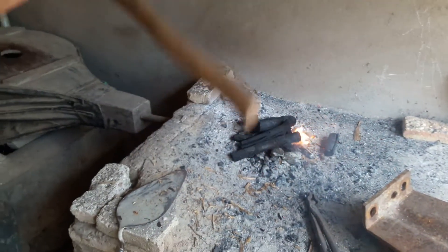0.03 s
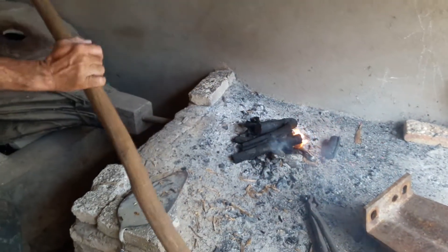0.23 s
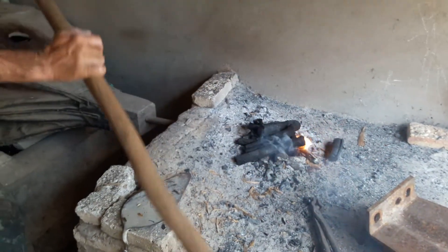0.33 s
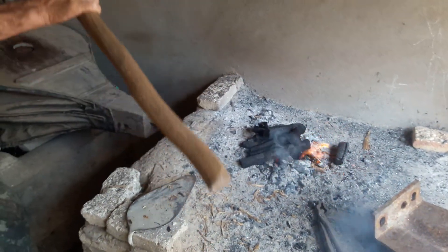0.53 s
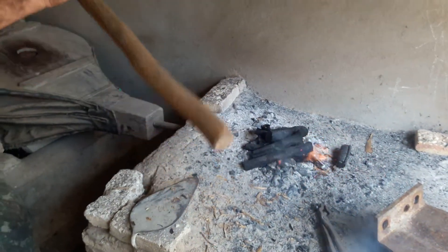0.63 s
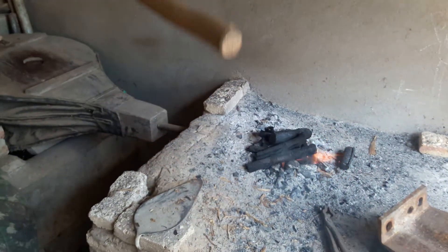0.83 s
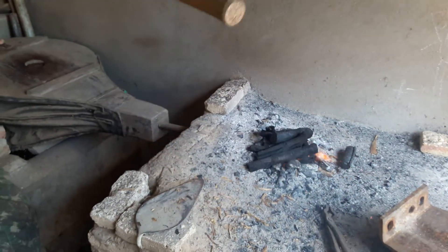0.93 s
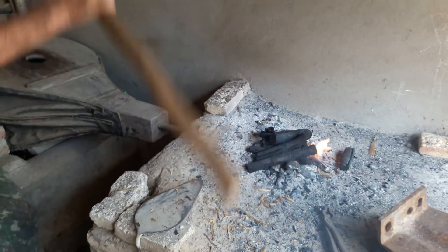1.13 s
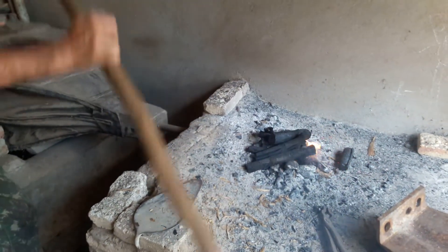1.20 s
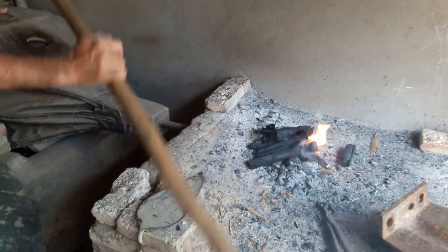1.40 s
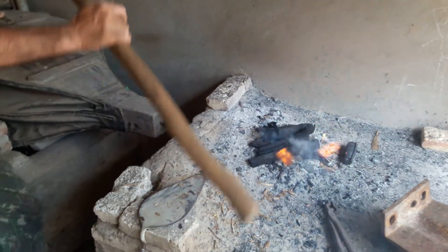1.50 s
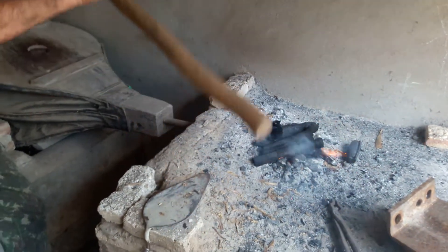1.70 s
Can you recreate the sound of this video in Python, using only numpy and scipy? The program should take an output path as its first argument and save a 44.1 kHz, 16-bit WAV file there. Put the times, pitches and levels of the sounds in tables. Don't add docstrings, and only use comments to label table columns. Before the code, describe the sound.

An old forge bellows breathes in and out, roaring into crackling coals with sharp claps and knocks

```python
import sys
import numpy as np
from scipy import signal
from scipy.fft import rfft, irfft
from scipy.io import wavfile
from scipy.ndimage import uniform_filter1d, map_coordinates

SR = 44100
rng = np.random.default_rng(int(sys.argv[2]) if len(sys.argv) > 2 else 0)


def undo_db(level):
    steps = np.asarray(level, float) / 20
    return 10 ** steps


def persist_wave(psi):
    counts = np.round(np.clip(psi, -1, 1) * 32767).astype(np.int16)
    wavfile.write(sys.argv[1], SR, np.atleast_2d(counts).T)


N = 77175
T = np.arange(N) / SR


def unit(x):
    return x / np.sqrt(np.mean(x ** 2))


def band(x, hz, width):
    b, a = signal.iirpeak(min(hz, .45 * SR), hz / max(width, 1), fs=SR)
    return signal.lfilter(b, a, x)


def air(colour):
    hz = np.arange(N // 2 + 1) * SR / N + 1
    points = np.array(colour)
    db = np.interp(np.log(hz), np.log(points[:, 0]), points[:, 1], left=-90)
    return unit(irfft(rfft(rng.standard_normal(N)) * undo_db(db), N))


def walk(rate_hz):
    k = int(SR / rate_hz)
    return unit(uniform_filter1d(uniform_filter1d(rng.standard_normal(N), k), k))


def strokes(curves, layer=0):
    gain = 0
    for curve in curves:
        s, db, over_db = np.array(curve).T
        gain = gain + undo_db(np.interp(T, s, db + layer * over_db, left=-120, right=-120))
    return gain


def rung(resonances, flutter_db, rate_hz):
    out = 0
    for hz, width, db in resonances:
        ring = rng.standard_normal(N)
        for _ in range(2):
            ring = band(ring, hz, 1.16 * width)
        shift = np.cumsum(.015 * walk(14))
        ring = unit(map_coordinates(ring, [np.arange(N) + shift], mode="mirror"))
        out = out + undo_db(db + flutter_db * walk(rate_hz)) * ring
    return out


# (frequency [Hz], level [dB per Hz])
SHOP_COLOUR = [(18, -54), (30, -11), (48, -10), (239, -23.5), (499, -2), (721, 3), (3140, -12), (8520, -76),
               (16000, -39)]


def shop():
    return air(SHOP_COLOUR) * undo_db(-63 + 1.5 * walk(8))


def room(x):
    gap_s, t60_s, level_db = .0015, 0.09, 4
    d = np.arange(int(.5 * SR)) / SR
    echoes = rng.standard_normal(len(d)) * undo_db(-60 * d / t60_s) * np.clip(d / gap_s, 0, 1)
    return signal.fftconvolve(x, echoes / np.sqrt(np.sum(echoes ** 2)))[:N] * undo_db(level_db)


# (start [s], length [s], from [Hz], to [Hz], peak level [dB])
SQUEAKS = [
    (1.354, .1, 745, 670, -51),
    (1.471, 0.06, 970, 840, -55),
    (1.215, 0.081, 4300, 4300, -60.5),
]


def squeaks():
    out = 0
    for start, length, from_hz, to_hz, db in SQUEAKS:
        u = np.clip((T - start) / length, 0, 1)
        hz = (from_hz + (to_hz - from_hz) * u) * (1 + 0.0089 * walk(60))
        tone = np.sin(2 * np.pi * np.cumsum(hz) / SR)
        out = out + undo_db(db + 2 * walk(50)) * np.sin(np.pi * u) * tone
    return out


# (time [s], peak level [dB], ring [Hz], swell [s], level of the side modes [dB])
KNOCKS = [
    (0.4795, -21, 1753, 0.0034, -6),
    (1.523, -22, 1700, 0.004, -0.5),
]
# (multiple of the ring [-], level [dB], time to fall 60 dB [s])
LEVER_MODES = [(1, 0.5, 0.0064), (.58, -3, 0.014), (.45, -6, 0.0067), (1.25, -5, 0.015),
               (1.9, -12.5, 0.0062), (.72, -3.5, 0.011), (.86, -24, 0.021), (1.55, -13, 0.015)]


def knocks():
    thud_t60_s = .09
    out = 0
    for s, db, ring_hz, swell_s, side_db in KNOCKS:
        d = np.maximum(T - s, 0)

        def mode(hz, t60_s, rise_s):
            swell = 1 - np.exp(-(d / rise_s) ** 2)
            fade = undo_db(-60 * np.maximum(d - rise_s, 0) / t60_s)
            return swell * fade * np.sin(2 * np.pi * hz * d)

        knock = undo_db(-9.5) * mode(96, thud_t60_s, 0.0029)
        knock = knock + undo_db(-14) * mode(160, thud_t60_s, .02)
        for multiple, mode_db, t60_s in LEVER_MODES:
            main = multiple == 1
            level = undo_db(mode_db + (0 if main else side_db))
            knock = knock + level * mode(ring_hz * multiple, t60_s, swell_s if main else .0004)
        out = out + undo_db(db) * knock
    return out


# (time [s], peak level [dB], colour [Hz], tail level [dB])
POPS = [(.0034, -27.5, 9200, -17), (0.1422, -33.5, 5900, -14.5), (0.45, -41, 7200, -28),
        (0.473, -43, 5000, -24), (0.5075, -41, 5200, -12.5), (0.514, -35, 10900, -11),
        (0.5292, -25.5, 9050, -17), (.667, -38, 6240, -27), (0.817, -30, 8300, -21.5),
        (1.079, -32.5, 7050, -21), (1.1982, -42, 8000, -19), (1.498, -41, 7340, -24),
        (1.514, -45, 7000, -14), (1.6288, -40, 7000, -15), (1.162, -43, 10000, -21),
        (1.553, -41, 10500, -11), (1.567, -46, 9500, -16), (1.64, -41, 11500, -16.5)]
# (time [s], peak level [dB], colour [Hz], tail level [dB])
STRIKES = [
    (.3409, -17, 3500, -22),
    (.3423, -11.5, 4800, -24),
    (.5894, -21, 8500, -17),
    (.5913, -18, 8000, -19),
    (1.3974, -22, 4600, -25),
    (1.3988, -20, 5000, -25),
]
FULL_CLAPS = (.341, .59, 1.3975)


def clicks():
    out = np.zeros(N + SR // 2)
    d = np.arange(SR // 2) / SR
    gap_s, fast_t60_s, slow_t60_s, slow_db = .0015, 0.11, 0.12, -9
    fade = undo_db(-60 * d / fast_t60_s) + undo_db(slow_db - 60 * d / slow_t60_s)
    fade = np.clip(d / gap_s, 0, 1) * fade
    thin = signal.butter(2, 3320, "highpass", fs=SR, output="sos")
    for s, db, hz, tail_db in STRIKES + POPS:
        spray = rng.standard_normal(len(d))
        splinter = undo_db(-15) * spray * np.exp(-d / .0005)
        crack = signal.sosfilt(thin, splinter - np.exp(-d / .00005))
        spread = hz * (.4 if db < -33 else 1)
        crack = band(crack, hz, 1.8 * spread)
        crack = crack / np.abs(crack).max()
        tail = unit(band(signal.sosfilt(thin, spray), hz, 2.3 * spread))
        if min(abs(s - clap) for clap in FULL_CLAPS) < .003:
            crack = crack - undo_db(1) * band(np.exp(-d / 0.00011), 1120, 2000)
            tail = tail + undo_db(-10) * unit(band(spray, 860, 290))
            tail = tail + undo_db(-8) * unit(band(spray, 1570, 390))
        patch_s, patch_db = 0.0017, 2.5
        patches = unit(uniform_filter1d(rng.standard_normal(len(d)), int(patch_s * SR)))
        tail = tail * undo_db(patch_db * patches)
        i = int(s * SR)
        out[i:i + len(d)] += undo_db(db) * (crack + undo_db(tail_db) * fade * tail)
    return out[:N]


# (peak time [s], pitch [Hz], peak level [dB], rise [s], fall [s])
BOOMS = [(.214, 174, -34.5, 0.0034, 0.0041), (0.234, 88.5, -35, .012, .009),
         (.2335, 176, -33, 0.0082, 0.0064), (0.2465, 188, -31.5, 0.0055, 0.0061),
         (.289, 184, -22, 0.0071, 0.0051), (0.313, 165, -16, 0.011, 0.017), (.35, 178, -30, 0.0031, 0.0031),
         (0.3175, 105, -30.5, 0.021, 0.0093), (.411, 89, -38, 0.011, 0.017), (.405, 151, -39, .01, 0.0071),
         (.566, 255.3, -35.5, 0.022, 0.078), (0.982, 266.5, -43.5, .0067, 0.029),
         (1.18, 241, -42, 0.018, 0.0093), (1.262, 292, -47, 0.011, 0.01), (1.304, 208, -39, 0.011, 0.01),
         (1.3406, 215, -30.5, 0.014, 0.014), (1.378, 142, -21, .01, 0.0069),
         (1.391, 165, -21.5, 0.0065, 0.0013), (1.38, 92, -26.5, 0.019, 0.009),
         (1.385, 285, -38, .012, 0.013), (1.413, 140, -29.5, 0.0076, 0.0067),
         (1.429, 182, -35, 0.0037, 0.0058), (1.491, 96, -47, .012, 0.015), (1.589, 246, -38, 0.032, 0.027),
         (.52, 736, -34.5, .006, 0.0048), (.585, 681, -42.5, 0.025, 0.012),
         (.83, 722, -37.5, 0.0061, 0.016), (.915, 674, -43.5, .015, .02), (1.0, 756, -43, 0.01, 0.014),
         (.95, 1496, -46, 0.039, 0.044), (1.585, 569.6, -36, .015, 0.022), (1.7, 751, -40.5, 0.0076, 0.017),
         (.512, 160, -43.5, 0.0058, .012), (1.55, 192, -37.5, .01, 0.0099)]


def booms():
    sag = 0.025
    out = 0
    for s, hz, db, rise, fall in BOOMS:
        d = T - s
        swell = np.exp(-.5 * (d / np.where(d < 0, rise, fall)) ** 2)
        turns = hz * (d - sag * d * d / (rise + fall))
        out = out + undo_db(db) * swell * np.cos(2 * np.pi * turns)
    return out


# (time [s], air hiss level [dB], fold rumble over the hiss [dB])
INTAKE = [
    [(.16, -66, 13), (.2, -52.5, -0.5), (.232, -46.5, -1.5), (.286, -43.5, 2), (.33, -45.5, -1.5),
     (.38, -49, -5.5), (.45, -63, 2.5)],
    [(1.215, -80, 29), (1.226, -55, -10), (1.286, -45, -9), (1.335, -42.5, -4.5), (1.385, -50, 4),
     (1.43, -54, 10), (1.5, -68.5, 10)],
]
# (frequency [Hz], level [dB per Hz])
GAP_COLOUR = [(240, -16), (400, -7.5), (536, -15.5), (708, -10.5), (1180, -9), (1990, -6), (2510, -13.5),
              (11000, -17), (16000, -27.5)]
# (frequency [Hz], width [Hz], level [dB])
HISS_PEAKS = [(1975, 120, -16), (2315, 25, -15), (4020, 630, -13), (6370, 450, -31), (8460, 1000, -11)]
# (frequency [Hz], width [Hz], level [dB])
FOLDS = [(77.5, 22, 0.5), (110, 36, -0.5), (157, 35, 1), (217.3, 66, 2.5), (319, 61, -12)]


def intake():
    hiss = air(GAP_COLOUR) * undo_db(1.7 * walk(47)) + rung(HISS_PEAKS, flutter_db=1.5, rate_hz=26)
    rumble = rung(FOLDS, flutter_db=2.5, rate_hz=36)
    return hiss * strokes(INTAKE) + rumble * strokes(INTAKE, layer=0.81)


# (time [s], roar level [dB], ember hiss over the roar [dB])
JET = [
    [(0, -42.5, -6), (.035, -45, -9.5), (.12, -56.5, -3.5), (.2, -60.5, -32)],
    [(.45, -58.5, -5), (.49, -46.5, -4), (.525, -41, -28), (.6, -43.5, -7), (.75, -43.5, -13),
     (.91, -40, -12), (1.08, -41.5, -13), (1.17, -50.5, -7.5), (1.25, -64.5, -37)],
    [(1.49, -57.5, -20), (1.53, -47.5, -9), (1.56, -42, -9.5), (1.595, -42, -16.5), (1.64, -43.5, -14.5),
     (1.75, -41.5, -17.5)],
]
# (frequency [Hz], width [Hz], level [dB])
NOZZLE = [(105.1, 7, -16), (175.8, 34, -8), (253, 44, -5.5), (425, 59, -9), (572.6, 50, -8.5),
          (666, 95, -4.5), (785, 57, -8.5), (1066, 69, -20), (1483, 170, -7.5), (1800, 100, -23.5),
          (1914, 650, -6.5)]
# (frequency [Hz], level [dB per Hz])
JET_COLOUR = [(40, -15), (240, 1.5), (480, -13.5), (730, 0), (2050, -19.5), (3000, -24), (5000, -48)]
# (frequency [Hz], level [dB per Hz])
EMBER_COLOUR = [(2000, -10), (3300, 4), (4700, 0), (7500, 3.5), (8500, 1.5), (12000, -1), (15500, -11)]


def nozzle_roar():
    roar = unit(rung(NOZZLE, flutter_db=1.5, rate_hz=52.6))
    roar = roar + undo_db(-1.5 + 1.48 * walk(52)) * air(JET_COLOUR)
    gain = strokes(JET)
    effort = (gain / undo_db(-42.5)) ** 0.07
    roar = roar + (effort - 1) * band(roar, 1700, 2000)
    gust_db = .8 * walk(14)
    return roar * gain * undo_db(0.5 + gust_db)


def ember_hiss():
    crackles_per_s, spread_db = 96, 4
    starts = rng.random(N) < crackles_per_s / SR
    ticks = starts * undo_db(spread_db * rng.exponential(size=N))
    ticks = signal.lfilter([1], [1, -.985], ticks)
    hiss = air(EMBER_COLOUR) * undo_db(walk(6.7)) * (1 + undo_db(-14) * ticks)
    return hiss * strokes(JET, layer=0.94)


def scene():
    wood = knocks()
    background = shop() + room(undo_db(-8) * wood)
    bellows = squeaks() + wood + clicks() + booms() + intake()
    fire = nozzle_roar() + ember_hiss()
    return (background + bellows + fire)[None]


def low_pass(x):
    return signal.sosfilt(signal.butter(12, 16830, fs=SR, output="sos"), x)


# (frequency [Hz], width [Hz], level added [dB])
PORT = [(4610, 570, -4), (6220, 480, -13), (8530, 140, -1.5), (11300, 550, -11)]


def record(dry):
    mix = dry + sum(undo_db(db) * band(dry, hz, width) for hz, width, db in PORT)
    bass_cut = signal.butter(3, 48, "highpass", fs=SR, output="sos")
    top_cut = signal.ellip(8, .3, 32, 15750, fs=SR, output="sos")
    edge = signal.ellip(12, .3, 90, 16750, fs=SR, output="sos")
    for cut in (bass_cut, top_cut, edge):
        mix = signal.sosfilt(cut, mix)
    return low_pass(mix)


dry = scene()
out = record(dry)
persist_wave(out)
```